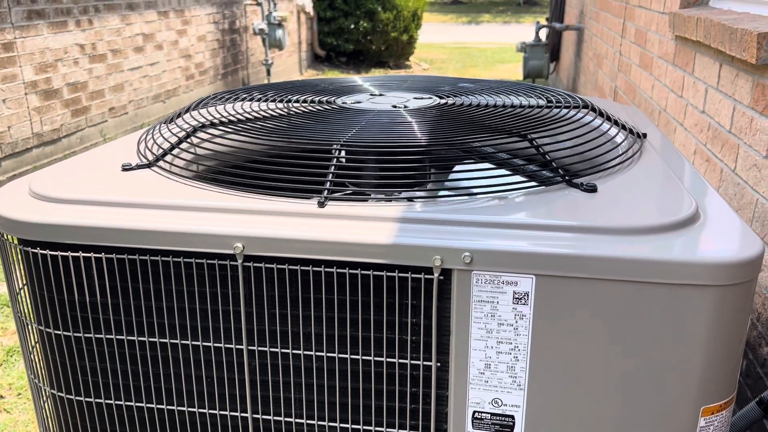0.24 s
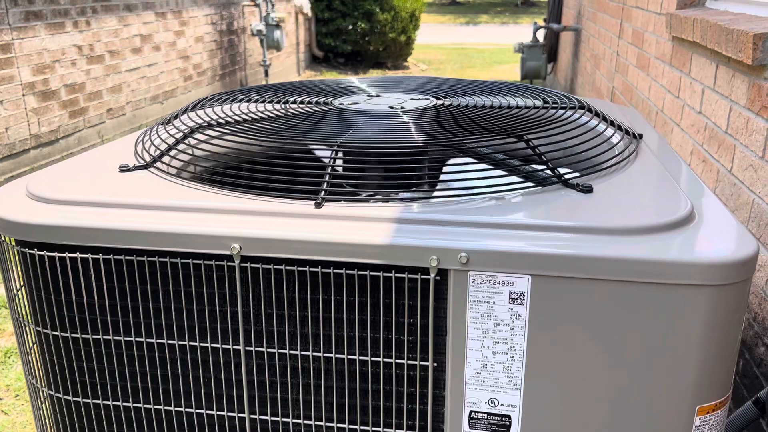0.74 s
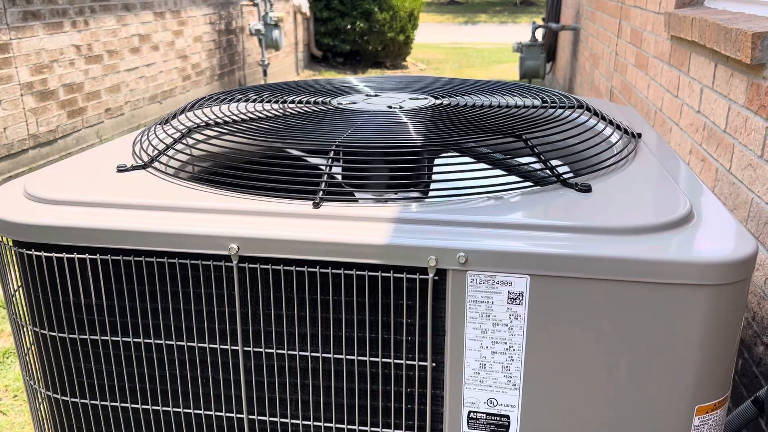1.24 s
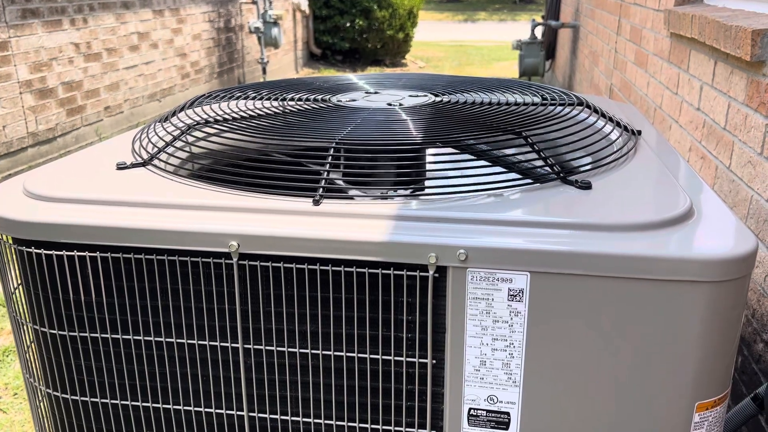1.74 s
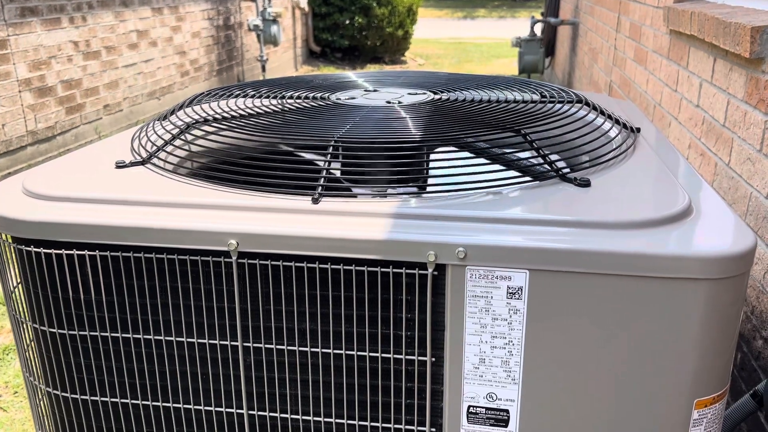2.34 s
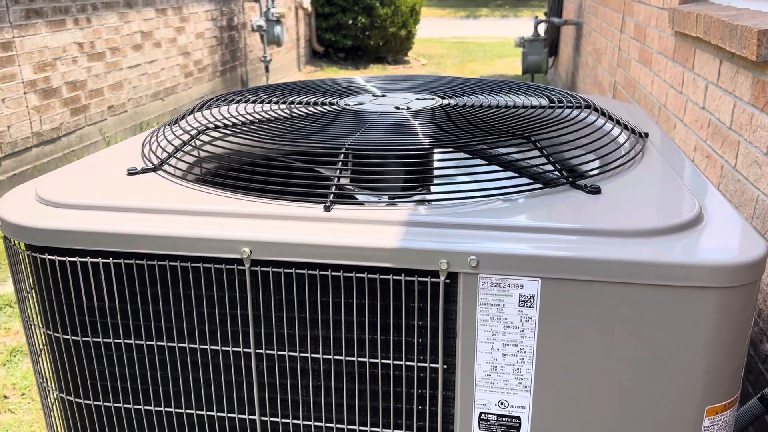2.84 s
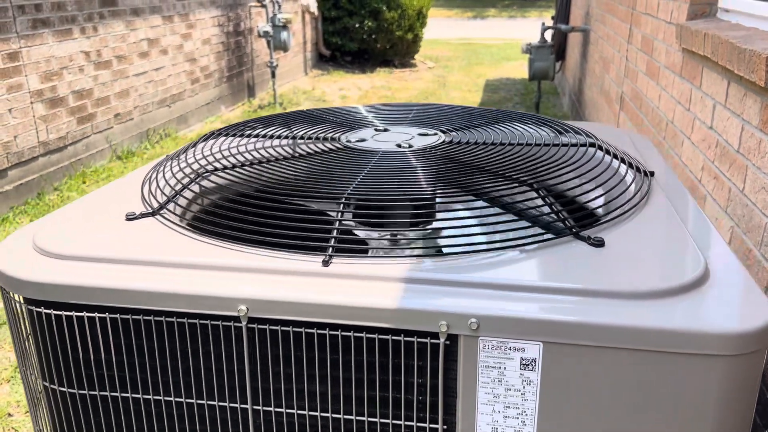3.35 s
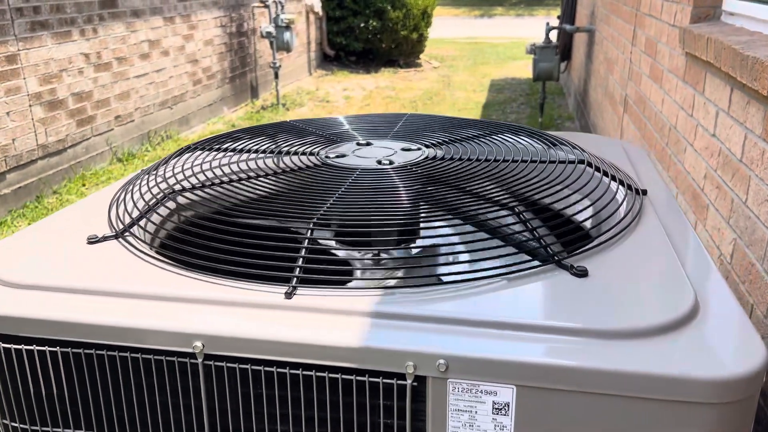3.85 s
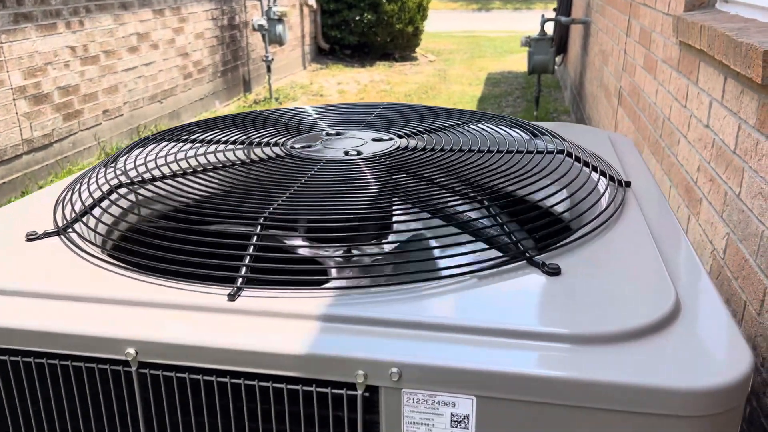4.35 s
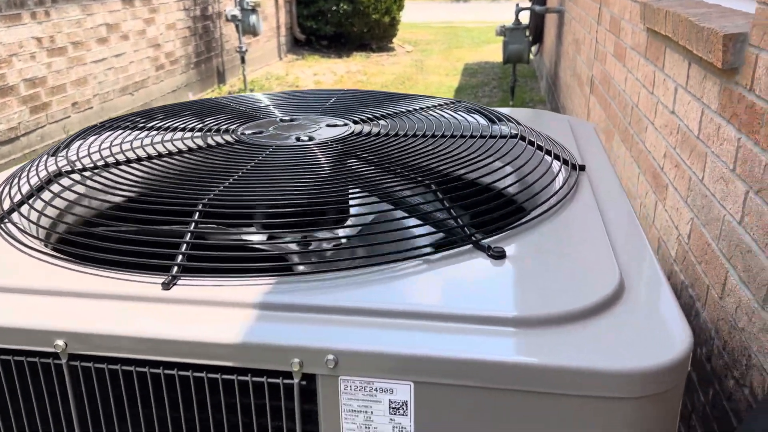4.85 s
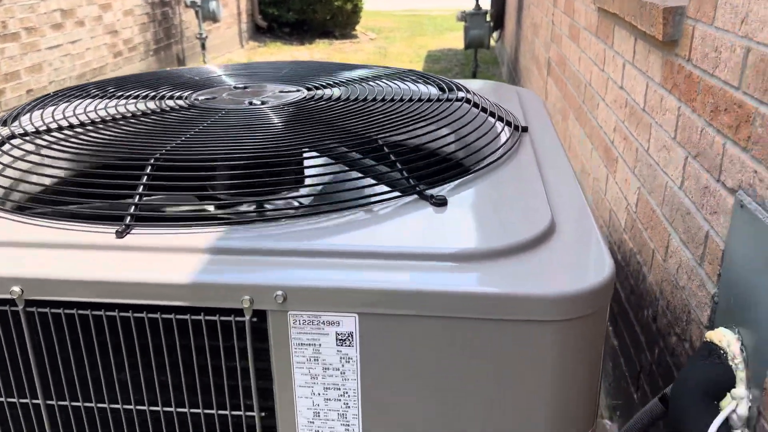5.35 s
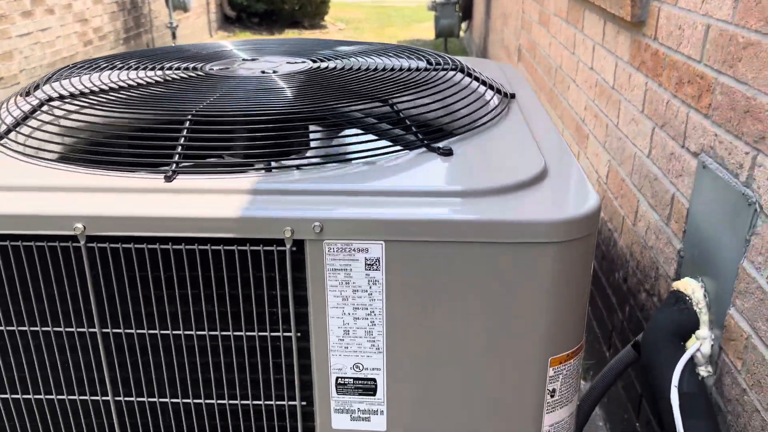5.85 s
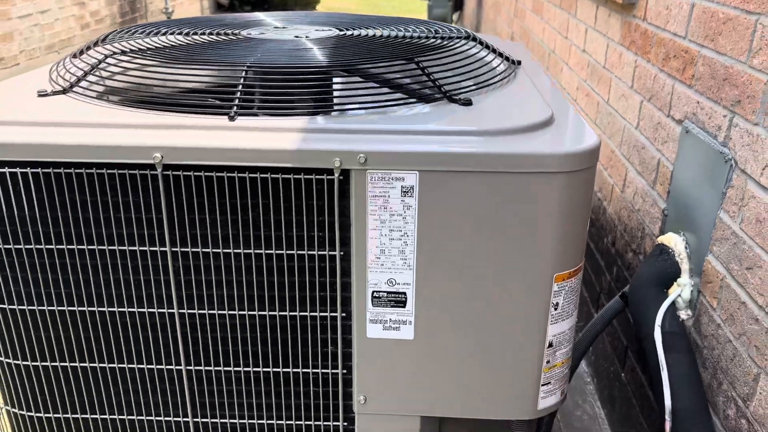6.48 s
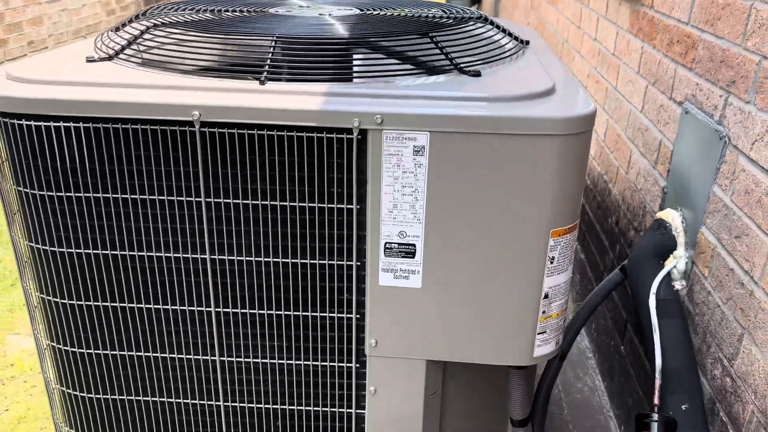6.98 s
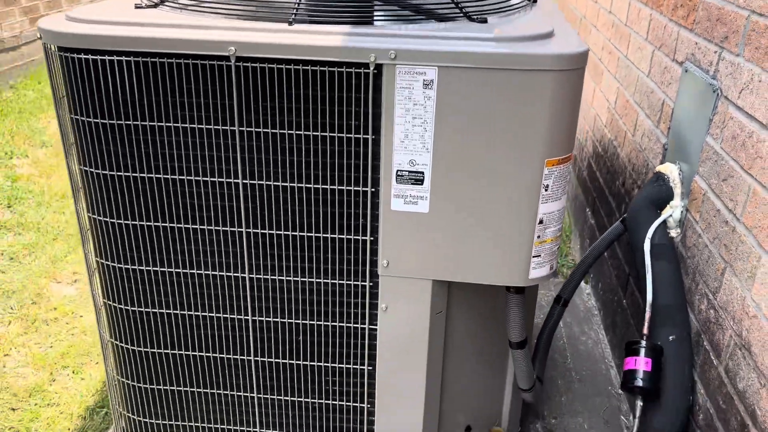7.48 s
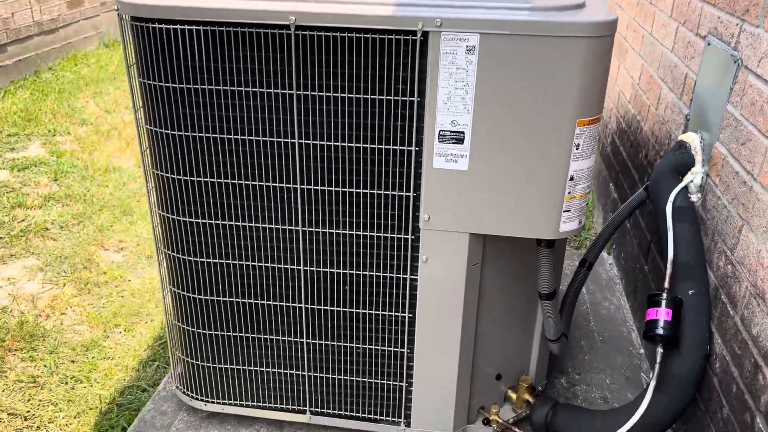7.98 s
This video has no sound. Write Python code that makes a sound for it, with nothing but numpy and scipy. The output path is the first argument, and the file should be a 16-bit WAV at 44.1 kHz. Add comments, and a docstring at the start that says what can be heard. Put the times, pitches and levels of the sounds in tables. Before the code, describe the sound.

Close to a running air conditioner condenser: low throbbing fan drone, airy whoosh, a rough electrical-sounding compressor buzz and faint shifting high whistles.

```python
"""A fan thumps over a rush of air and a compressor buzz: an outdoor cooling unit beside a brick wall.
Blade, motor and compressor sounds are sums of tones; the treble buzz is a waveform repeated each turn.
The air is noise shaped by short-time spectra, with a low cabinet boom; puffs strike the ports.
The listener holds a pair of microphone ports, stands still, leans over the fan, then steps to the side."""
import sys
import numpy as np
from scipy import signal
from scipy.fft import rfft, irfft, next_fast_len
from scipy.io import wavfile
from scipy.ndimage import uniform_filter1d, map_coordinates

SR = 44100
rng = np.random.default_rng(int(sys.argv[2]) if len(sys.argv) > 2 else 0)


def unload_audio(sound):
    """Save the sound as a 16-bit wav file, at the path given as the first command line argument."""
    columns = np.transpose(np.atleast_2d(sound))
    # keep every value between -1 and 1, then stretch to whole-number steps
    steps = np.round(np.clip(columns, -1, 1) * 32767)
    wavfile.write(sys.argv[1], SR, steps.astype(np.int16))


N = 362502
TIME_S = np.arange(N) / SR

SHAFT_HZ = 58.9767  # compressor turns per second
KNOCK_RAD = 0.8  # where in the turn the compressor knocks
EDGE_HZ = 15750  # upper limit of the sound
CORNER_M = 1.22  # distance walked to the side of the unit
HELD_REACH_M = 0.23  # how far the first standing place extends

# the listener's move: time_s, nearness_db (to the fan), walked_m
LISTENER_MOVE = [(0, -2.5, 0.019), (.9, -1.5, 0.0023), (1.7, -2.5, 0.043), (2.5, -1, 0.068),
                 (2.9, -1.5, 0.027), (3.3, -2.5, 0.22), (3.7, -1, 0.46), (4.5, -1, 0.54), (5.4, -0.5, 0.77),
                 (5.901, -1.5, 0.867), (6.3, -2, 0.93), (6.9, -1.5, 1.15), (7.7, -3, 1.34),
                 (8.22, -4, 1.36)]


def gain_of(db):
    """Decibels to amplitude."""
    return np.exp(np.asarray(db) * np.log(10) / 20)


def evened(x):
    """Scale to rms 1."""
    return x / np.sqrt(np.mean(x ** 2) + 1e-20)


def bell(x, at, reach):
    """Smooth hump of height 1, down to 1/e at the reach."""
    return np.exp(-((x - at) / reach) ** 2)


def read(points, hz, axis=1):
    """One column of a table, joined on a log-frequency axis."""
    table = np.transpose(points)
    return np.interp(np.log(hz + 1), np.log(table[0] + 1), table[axis])


def nearness_db(t=TIME_S):
    """Nearness to the fan at the times t."""
    table = np.transpose(LISTENER_MOVE)
    return np.interp(t, table[0], table[1])


def walked_m(t=TIME_S):
    """Place along the listener's walk at the times t."""
    table = np.transpose(LISTENER_MOVE)
    return np.interp(t, table[0], table[2])


def drift(top_hz):
    """Slow random wander of rms 1, from twenty sines up to top_hz."""
    t = np.arange(0, N, 256) / SR
    slow = np.zeros(len(t))
    for hz in np.geomspace(top_hz / 20, top_hz, 20):
        slow += np.sin(2 * np.pi * (hz * t + rng.random())) / np.sqrt(hz)
    return np.interp(TIME_S, t, evened(slow))


def tone(hz, db, start, t=TIME_S):
    """Cosine with its rms level in dB and its starting phase in radians."""
    return np.sqrt(2) * gain_of(db) * np.cos(2 * np.pi * hz * t + start)


def sent():
    """When the sound now arriving left the compressor; a changing path bends its pitch."""
    # extra distance from compressor to listener: time_s, extra_m
    path = [(0, 0), (2.5, .01), (3.3, .04), (4.5, -.02), (5.2, -.03), (5.75, .045), (6.5, .125),
            (7.25, .25), (8.22, .37)]
    extra_m = uniform_filter1d(np.interp(TIME_S, *np.transpose(path)), size=8192)
    return TIME_S - extra_m / 343  # speed of sound in m/s


def rush():
    """Air noise from random short-time spectra with faint patches; the bass follows nearness most."""
    # spectrum of the air before place and patches are added: pitch_hz, level_db (per Hz)
    air_spectrum = [(43, -69), (51, -56.5), (75, -53.5), (100, -60.5), (150, -60.5), (280, -69.5),
                    (650, -68), (950, -75), (1150, -74), (1450, -79), (1800, -80.5), (2600, -86),
                    (5500, -89.5), (6300, -87.5), (7300, -89), (8400, -84.5), (9300, -89), (11400, -94),
                    (15500, -100)]
    roar_db, over_fan_db, shade_db = 0.44, 3, -1.5
    over_fan_m, fan_reach_m, shade_reach_m = 0.37, 0.37, 0.18
    frames, hz = N // 512 + 5, np.fft.rfftfreq(2048, 1 / SR)
    t = np.arange(frames) * 512 / SR
    re, im, patches = rng.standard_normal((frames, 1025, 3)).T
    patches = evened(uniform_filter1d(uniform_filter1d(patches, 20, 0), 10, 1))

    # the jet roars most over the fan; the cabinet shades it round the corner
    place_db = roar_db + over_fan_db * bell(walked_m(t), over_fan_m, fan_reach_m)
    place_db += shade_db * bell(walked_m(t), CORNER_M, shade_reach_m)
    roar_share = np.exp(-np.log((hz + 1) / 550) ** 2 / 1.7)[:, None]
    near_share = (0.13 + 1.37 * 300 / (hz + 300))[:, None]
    patch_db = 1.47 * (hz / (hz + 250))[:, None]
    db = read(air_spectrum, hz)[:, None] + near_share * nearness_db(t)
    db = db + roar_share * place_db + patch_db * patches
    spectra = (re + 1j * im) * gain_of(db)
    return 5.36 * signal.istft(spectra, nperseg=2048, noverlap=1536)[1][:N]


def boom():
    """The cabinet booms with the air: noise in one narrow low resonance."""
    # cabinet resonance: pitch_hz, width_hz
    hz, width_hz = (64.4, 5.3)
    level_db, fade_db, fade_m, fade_reach_m = -36.5, -8, 0.5, 0.45
    swell_db, swell_s, swell_reach_s = 2.5, 0.9, 1
    r = np.exp(-np.pi * width_hz / SR)
    resonance = [1, -2 * r * np.cos(2 * np.pi * hz / SR), r * r]
    ring = signal.lfilter([1], resonance, np.diff(rng.standard_normal(N + SR)))
    # it dies away once the listener has passed the fan
    passed = (1 + np.tanh((walked_m() - fade_m) / fade_reach_m)) / 2
    db = level_db + fade_db * passed + swell_db * bell(TIME_S, swell_s, swell_reach_s)
    return gain_of(db) * evened(ring[-N:])  # the ring's onset is left out


def puffs():
    """Low lumpy noise: quick-starting puffs over a flutter that grows as the listener sets off."""
    # puffs of air on the ports: time_s (just after the peak), level_db, length_s
    air_puffs = [(2.764, -30, 0.045), (3.025, -33, 0.1), (3.275, -38, 0.049), (4.922, -36, 0.15),
                 (5.49, -39, 0.04), (7.91, -40, 0.04), (8.177, -31, 0.028)]
    flutter_db = -72.0 + 13.7 * np.minimum(walked_m() / 0.069, 1)
    shape = gain_of(flutter_db + 6.2 * np.clip(drift(16.), -3, 1.5))
    for s, db, length in air_puffs:
        near = slice(max(round((s - length) * SR), 0), round((s + 4 * length) * SR))
        u = np.maximum((TIME_S[near] - s) / length + 0.41, 0) * 3.5
        shape[near] += gain_of(db) * u * np.exp(1 - u)
    band = signal.butter(2, [45, 150], "bandpass", fs=SR, output="sos")
    return shape * evened(signal.sosfilt(band, rng.standard_normal(N)))


def motor():
    """Steady magnetic hum at multiples of the mains, and one faint whine of the fan."""
    # motor hum: mains_multiple, level_db
    hum_tones = [(2, -48.5), (4, -52.5), (28, -65.5)]
    mains_hz = 60.0
    out = tone(1162.8, -62 + drift(2.3), 0)
    for k, db in hum_tones:
        out += tone(round(k) * mains_hz, db + drift(1.42), 2 * np.pi * rng.random())
    return out


def buzz(step_m=0.0906, count=24, size=8192):
    """One turn's treble waveform; wall echoes give it another random mix of orders every step_m."""
    # the compressor's higher orders through its shell: pitch_hz, level_db (mean)
    shell_spectrum = [(2400, -71), (3200, -72), (3700, -69), (4500, -70.5), (5100, -71.5), (5700, -69.5),
                      (6300, -66), (7300, -73.5), (8000, -68), (8800, -68.5), (9500, -114), (11300, -69.5),
                      (12300, -91), (13500, -105), (15500, -87)]
    from_order, hush_to_order, hush_db = 42, 118, -7.5
    rise_db_per_m = 0.5
    order = np.arange(size // 2 + 1)
    in_band = (order >= from_order) * (order * SHAFT_HZ < EDGE_HZ)
    level = gain_of(read(shell_spectrum, order * SHAFT_HZ)) * in_band
    re, im = rng.standard_normal((count, len(order), 2)).T

    # at the first place the orders below hush_to_order are faint here
    first_place = bell(np.arange(count) * step_m, 0, HELD_REACH_M / 2)
    hush = gain_of(hush_db * np.outer(order < hush_to_order, first_place))
    turns = irfft(hush * level[:, None] * (re + 1j * im), size, axis=0) * size / 2
    turn_rad = 2 * np.pi * np.arange(size) / size
    turns *= gain_of(1.2 * np.cos(turn_rad - KNOCK_RAD))[:, None]  # loudest at the knock

    # crossfade between neighbouring places along the walk
    spot = np.clip(np.maximum.accumulate(walked_m()) / step_m, 0, count - 2)
    angle = sent() * SHAFT_HZ % 1 * size
    behind, share = np.floor(spot), np.pi / 2 * (spot % 1)
    here = map_coordinates(turns, [angle, behind], order=1, mode="grid-wrap")
    ahead = map_coordinates(turns, [angle, behind + 1], order=1, mode="grid-wrap")
    place_gain = gain_of(.5 * nearness_db() + rise_db_per_m * walked_m())
    return place_gain * (np.cos(share) * here + np.sin(share) * ahead)


def whistles():
    """Steady shaft orders at the first place; later shell modes swell, each across five orders."""
    # higher orders that stand out at the first place: shaft_multiple, level_db
    held_orders = [(48, -64.5), (52, -72.5), (56, -69), (58, -75), (59, -64.5), (60, -62.5), (61, -63),
                   (62, -70), (64, -63.0), (65, -64.5), (67, -61), (69, -70.0), (71, -77), (73, -63.5),
                   (74, -63.5), (75, -59.5), (76, -64), (78, -63.5), (79, -67.0), (83, -68.5), (85, -75),
                   (88, -64), (91, -64), (92, -67), (95, -69), (97, -65.5), (101, -66), (102, -61),
                   (104, -65.5), (106, -70), (107, -62.0), (108, -64.5), (110, -66.0), (111, -64),
                   (112, -69), (113, -67.5), (114, -68), (116, -62), (132, -61), (134, -63), (135, -69),
                   (138, -64), (139, -61), (141, -68), (142, -69.5), (147, -65.5)]
    # modes that swell as the listener passes a loud spot:
    # time_s, shaft_multiple, level_db, length_s, beside_db (change per order away from the middle)
    swelling_modes = [(3.05, 150, -61, .5, -6), (3.3, 88, -61, 1.2, -7), (3.5, 72, -62, 0.6, -4),
                      (3.4, 104, -59, .8, -9), (3.5, 193, -62, .6, -3), (3.7, 130, -56.5, .7, -6),
                      (3.7, 107, -53, 0.85, -10), (3.7, 139, -61, .6, -2), (3.85, 86, -67.5, .6, 2),
                      (4, 126, -63, 1.1, -4), (4.2, 149, -56.5, 1.6, -4.5), (4.2, 62, -66, 1.4, -10),
                      (4.4, 138, -62, 1, -2), (4.852, 104, -59.5, 0.6, -9), (4.9, 48, -64, 1.6, -9),
                      (4.55, 135, -60, .6, -4), (5.05, 73, -60, .7, -4.5), (5.25, 97, -66, 0.78, -8),
                      (5.3, 106, -61, 0.92, -3), (5.3, 93, -64, 0.65, -2), (5.3, 116, -65, 1.2, -6),
                      (5.35, 132, -63, 0.74, -8), (5.8, 135, -58, 0.8, -7), (5.9, 149, -64, .7, -3),
                      (6, 64, -61.5, 1.4, -9), (6.1, 108, -61.5, 0.75, -2), (6.25, 78, -66.5, 0.6, 2),
                      (6.4, 126, -64, 1.3, -6), (6.3, 131, -58, 0.79, -6), (6.75, 86, -64, 1, -.5),
                      (6.7, 139, -54, 0.61, -6), (6.75, 149, -60, 0.42, -4), (6.75, 122, -60, .5, -8),
                      (7.25, 134, -65, .6, -8), (7.5, 62, -61.5, 0.84, -5), (7.75, 137, -63, .6, -6),
                      (8.05, 93, -62, .5, 0)]
    loose_rad = 1.15  # how loosely these orders keep to the knock
    far_neighbour_db = -1.5  # further change two orders away
    left, out = sent(), np.zeros(N)
    stay = bell(walked_m(), 0, HELD_REACH_M)
    heard = [(k, db, stay) for k, db in held_orders]
    for s, k, db, length, beside_db in swelling_modes:
        swell = bell(TIME_S, s, length / 2)
        for step in range(-2, 3):
            step_db = db + beside_db * abs(step) + far_neighbour_db * (abs(step) == 2)
            heard.append((k + step, step_db, swell))
    starts = loose_rad * rng.standard_normal(len(heard))
    for (k, db, swell), start in zip(heard, starts):
        k = round(k)
        on = swell > .03
        out[on] += swell[on] * tone(k * SHAFT_HZ, db, start - KNOCK_RAD * k, left[on])
    return out


def compressor():
    """Shaft orders lined up into one knock a turn, tightest near the loudest; front gives way to side."""
    # orders that stand out: shaft_multiple, front_db, side_db (levels heard from each place)
    shaft_orders = [(4, -50, -47.5), (5, -61, -54), (6, -54, -56.5), (8, -70, -74), (10, -53, -54),
                    (12, -55.5, -53.5), (13, -56.5, -56), (14, -58, -52), (15, -55.5, -49), (16, -66, -53),
                    (17, -72, -76), (18, -55.5, -65.5), (19, -39, -44), (20, -51.5, -57),
                    (21, -54.5, -54.5), (22, -49.5, -66), (23, -55, -65.5), (24, -73, -62.5),
                    (25, -78, -59), (26, -61, -66), (27, -65, -51.5), (28, -54.5, -67), (29, -62, -59),
                    (30, -51.5, -57.5), (31, -59, -59.5), (32, -60, -62), (33, -61.5, -83),
                    (34, -57, -62.5), (35, -68, -59), (36, -86, -81), (37, -62, -65.5), (38, -73, -62),
                    (39, -63, -78), (40, -61.5, -65)]
    # spots where echoes lift or cancel one order: walked_m, shaft_multiple, reach_m, change_db
    echo_spots = [(0.7, 6, 0.4, 6), (0.67, 18, 0.72, 18.5), (0.99, 20, 0.13, 2), (0.71, 14, 0.21, -12),
                  (0.57, 15, 0.25, -9.5), (0.51, 21, 0.33, -3), (0.81, 21, 0.081, -5), (0.92, 22, 0.14, 10),
                  (0.98, 23, .15, 6.5), (0.65, 26, 0.3, 5), (0.29, 27, 0.22, 9.5), (0.72, 27, 0.15, 0),
                  (0.27, 24, 0.15, 3), (1.24, 24, 0.11, 12), (.45, 25, .1, 5), (0.83, 16, 0.08, -16),
                  (0.2, 16, 0.1, -7), (1.03, 28, 0.18, 12), (0.53, 29, 0.25, -11), (1.05, 30, 0.18, 7.5),
                  (0.86, 31, 0.24, -29), (0.82, 32, .15, -2), (1.06, 34, 0.17, 11), (1.05, 26, .12, 6),
                  (0.7, 34, .07, -6), (0.69, 35, 0.08, 4), (0.49, 35, .1, -17), (1.07, 37, 0.22, 7.5),
                  (0.94, 40, 0.14, 6), (0.69, 13, .3, -2), (.5, 12, 0.33, 2)]
    loudest, ring_rad, scatter_rad = 19, .6, .12  # an order, then phase offsets away from it
    steps, out = np.arange(0, N, 256) / SR, np.zeros(N)
    walked, left = walked_m(steps), sent()
    side = np.clip(walked / CORNER_M, 0, 1)
    for k, front_db, side_db in shaft_orders:
        k = round(k)
        db = front_db + (side_db - front_db) * side
        for m, order, reach, change_db in echo_spots:
            if round(order) == k:
                db = db + change_db * bell(walked, m, reach)
        away = k - loudest
        scatter = min(scatter_rad * away ** 2, 2.5) * rng.standard_normal()
        start = -KNOCK_RAD * k + ring_rad * abs(away) + scatter
        out += tone(k * SHAFT_HZ, np.interp(TIME_S, steps, db), start, left)
    return out


def blades():
    """Blade-pass tones line up into one pressure peak per blade; eddies make level and phase waver."""
    # blade-pass tones: blade_multiple, level_db
    blade_tones = [(1, -37), (2, -33.5), (3, -36.5), (4, -37.5), (5, -44.5), (6, -51), (7, -64), (8, -52.5),
                   (9, -52)]
    # moments when one tone is louder or softer: time_s, blade_multiple, reach_s, change_db
    blade_moments = [(.4, 2, 0.85, 3), (1.23, 2, 0.18, -4), (4.07, 2, 1, 2.5), (6, 2, 0.6, -4.5),
                     (4.3, 3, 0.94, 2), (2.64, 4, 0.53, -2.5), (5.38, 4, 0.85, 1.5), (3.2, 5, 0.78, 2),
                     (6.2, 5, 0.5, -9), (6.8, 5, 0.42, 4)]
    blade_hz, waver_db, waver_rad = 41.793, .6, .05  # phase waver is per multiple
    out = np.zeros(N)
    for k, db in blade_tones:
        k = round(k)
        level_db = db + nearness_db() + waver_db * drift(6.)
        for s, multiple, reach, change_db in blade_moments:
            if round(multiple) == k:
                level_db += change_db * bell(TIME_S, s, reach)
        lead = 2.8 if k == 1 else .7  # the lowest tone runs ahead of the peak
        out += tone(k * blade_hz, level_db, 2.194 * k + lead + waver_rad * k * drift(3.9))
    return out


def ports(direct, diffuse, other):
    """Right hears left shifted in phase and level; of the diffuse sound only a share is alike."""
    # the two microphone ports, in three ranges with the same columns:
    # pitch_hz, likeness (0-1), left_minus_right_db, left_lead_rad
    bass = [(20, 1, 0, 0), (110, 1, 0, 0)]  # alike in both
    middle = [(172, 0.98, -1, -0.22), (247, 1, -1.5, -0.42), (440, 0.56, 1.5, 0.82), (605, 1, 0.5, 0.73),
              (1140, 0.11, 4, 0.52), (1650, 0.5, 2, 0.87), (2970, 0.28, 2.5, 0.23), (3980, 0.82, 4, 0.75),
              (6400, 0.78, 4, 0.86), (7500, 0.83, 2, 0.83), (8980, 0.76, -0.5, 0.15)]
    treble = [(9650, 1, 0, -np.pi), (10600, 1, 0, -np.pi), (11700, 1, 0, -2 * np.pi),
              (12600, 1, 0, -2 * np.pi), (13450, 1, 0, -3 * np.pi), (14150, 1, 0, -3 * np.pi),
              (14950, 1, 0, -4 * np.pi)]  # falls out of step and back, twice
    table = bass + middle + treble
    size = next_fast_len(N + SR)
    hz = np.fft.rfftfreq(size, 1 / SR)
    same = np.clip(read(table, hz), 0, 1)
    lean = gain_of(read(table, hz, axis=2) / 2)
    lag = np.exp(-1j * read(table, hz, axis=3))
    direct, diffuse, other = rfft([direct, diffuse, other], size)
    left = direct + diffuse
    right = direct + same * diffuse + np.sqrt(1 - same ** 2) * other
    return irfft([lean * left, lag * right / lean], size)[:, :N]


def turned(heard):
    """One turn to the left tilts the middle of the spectrum toward the left port, then back."""
    turn_db, turn_s, turn_length_s = 2.5, 5.56, 1
    band = signal.butter(4, [500, 6000], "bandpass", fs=SR, output="sos")
    middle = signal.sosfiltfilt(band, heard)
    tilt_db = np.outer([.5, -.5], turn_db * bell(TIME_S, turn_s, turn_length_s))
    return heard + middle * (gain_of(tilt_db) - 1)


def scene():
    """The unit as it reaches the two ports, with the puffs on top."""
    direct = blades() + motor() + compressor() + whistles() + boom()
    heard = turned(ports(direct, rush() + buzz(), rush() + buzz()))
    return heard + np.outer([1, -1], puffs())  # the ports feel a puff in opposite senses


def record(dry):
    """A steep bass cut, then the band limit."""
    bass_cut = signal.butter(5, 36.6, "highpass", fs=SR, output="sos")
    cut = signal.sosfiltfilt(bass_cut, dry)
    band_limit = signal.firwin(1023, EDGE_HZ, window=("kaiser", 9), fs=SR)
    return signal.oaconvolve(cut, band_limit[None], "same")


dry = scene()
out = record(dry)
unload_audio(out)
```